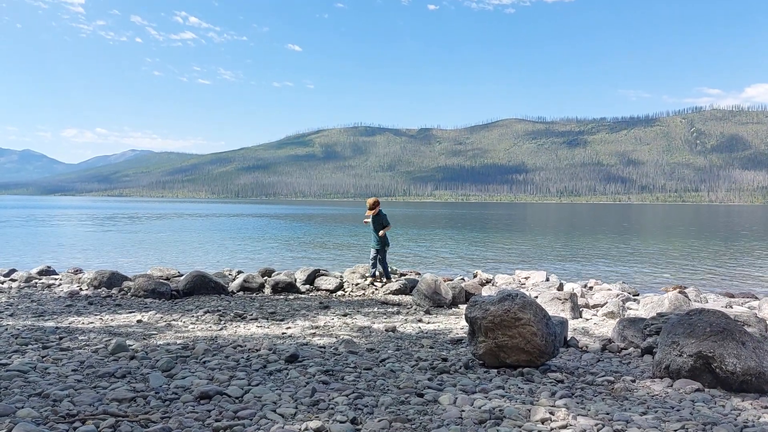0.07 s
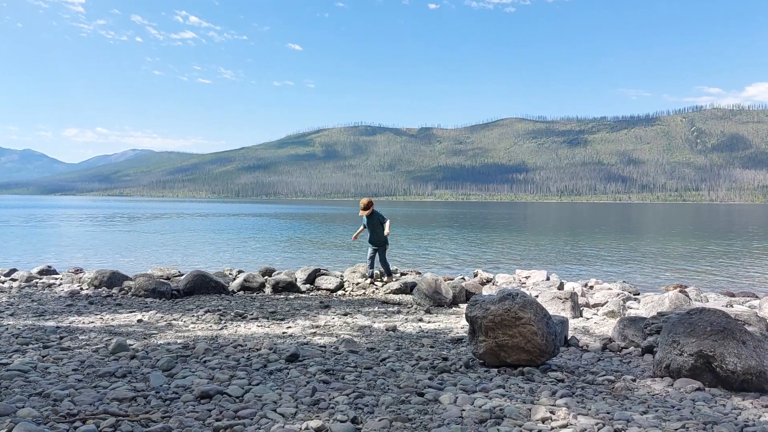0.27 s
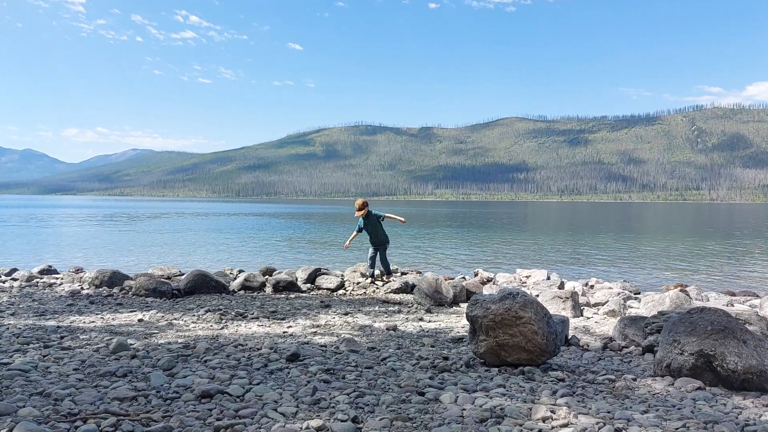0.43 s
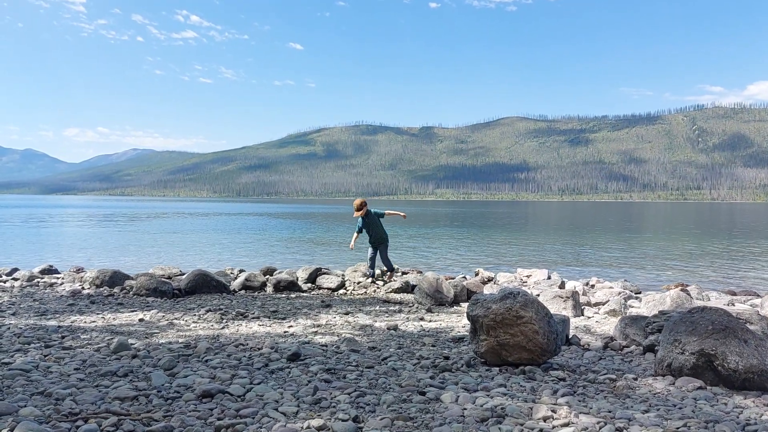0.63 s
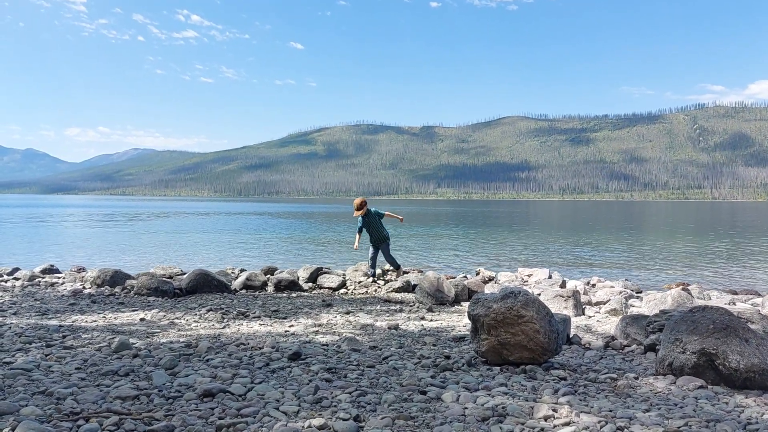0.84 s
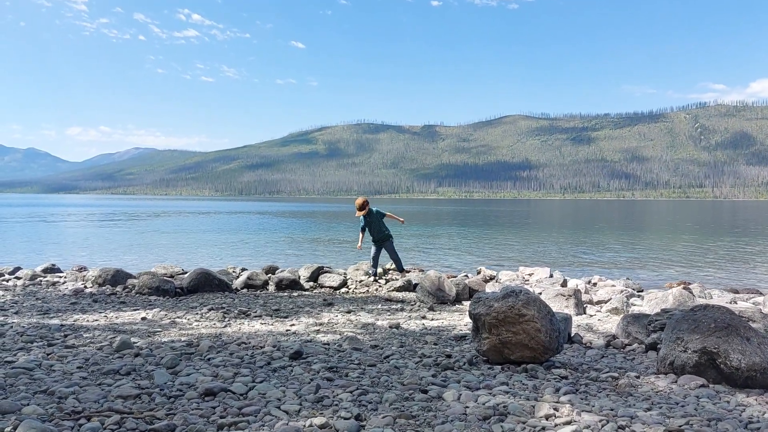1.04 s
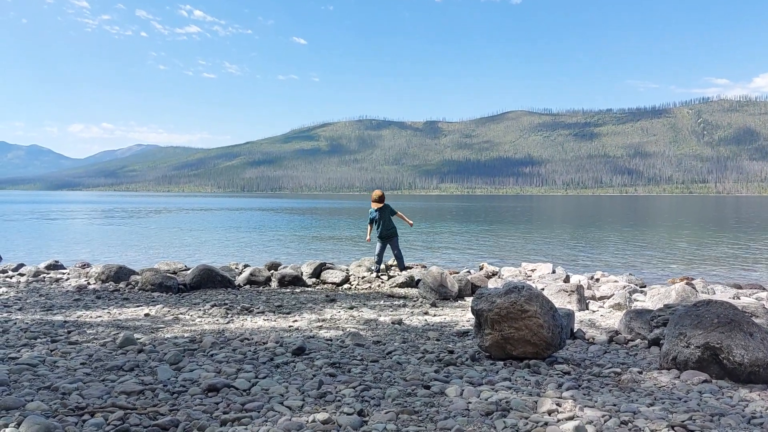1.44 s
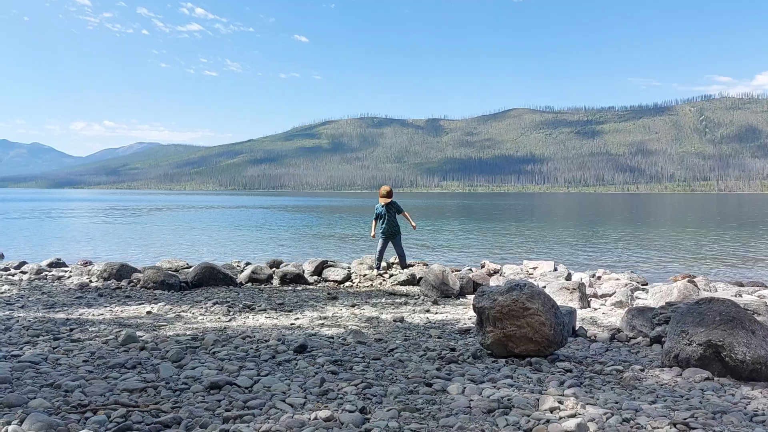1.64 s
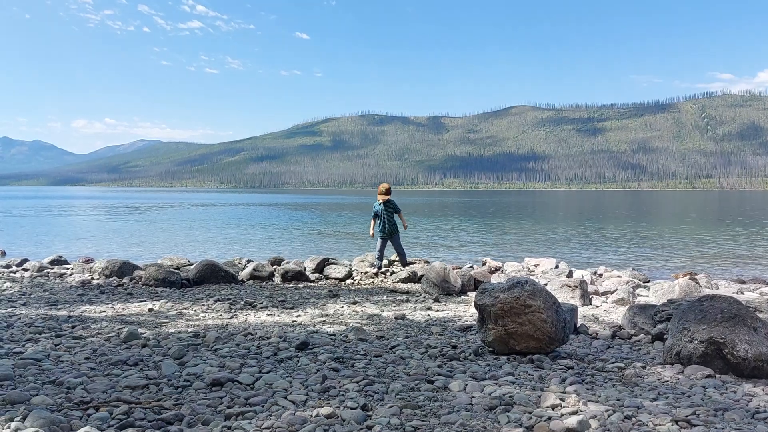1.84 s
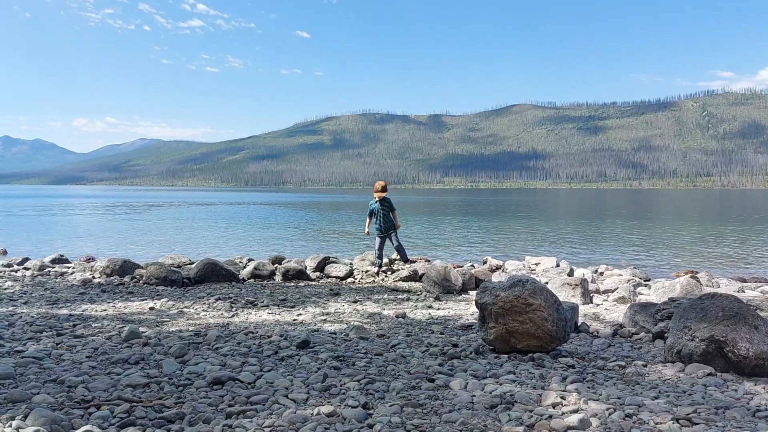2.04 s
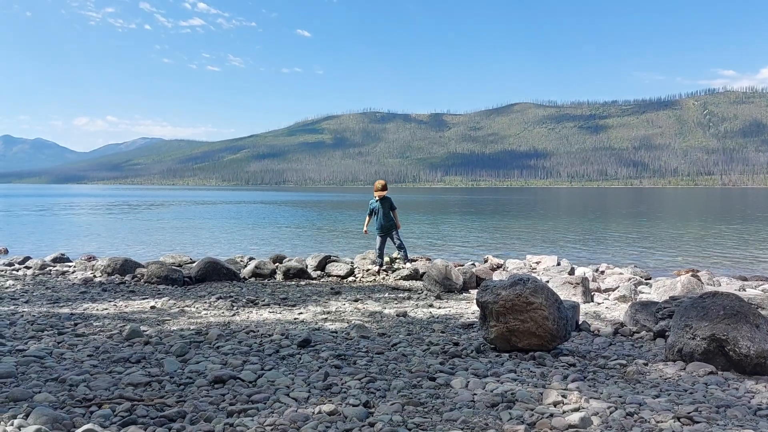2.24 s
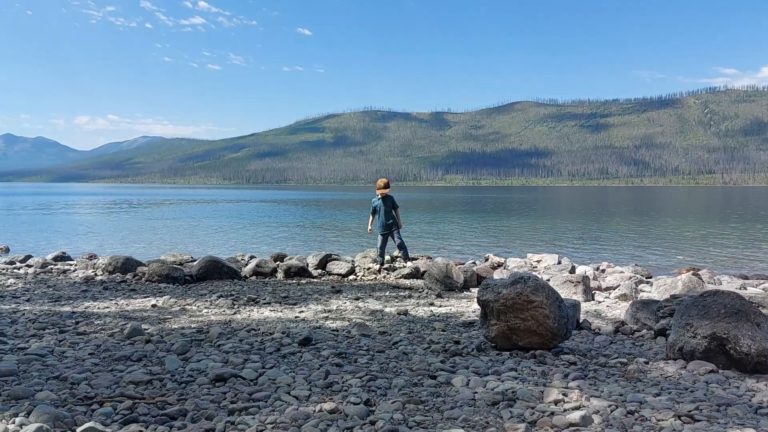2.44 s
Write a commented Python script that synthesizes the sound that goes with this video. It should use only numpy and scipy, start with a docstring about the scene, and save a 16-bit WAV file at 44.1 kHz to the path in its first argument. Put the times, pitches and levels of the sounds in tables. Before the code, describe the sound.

Stones crunch and click underfoot with rustling clothes over a low wind.

```python
"""A pebble lakeshore: someone shifts their footing, close by and to the left. Clothing swishes as its fibres
slip, grit crunches under the shoe in tiny ringing grains, and loose stones click and grind against each other,
some knocks with a hollow low body. Behind it lie a low wind and a faint steady drone, perhaps a far motor."""
import sys
import numpy as np
from scipy import signal
from scipy.fft import rfft, irfft
from scipy.io import wavfile

SR = 44100
rng = np.random.default_rng(int(sys.argv[2]) if len(sys.argv) > 2 else 0)


def log_audio(samples):
    """Write samples as a 16-bit WAV file to the path given in sys.argv[1]."""
    # one column per channel
    frames = np.atleast_2d(samples).T
    # limit to full scale, then quantise
    limited = np.clip(frames, -1, 1)
    pcm = np.round(limited * 32767).astype(np.int16)
    wavfile.write(sys.argv[1], SR, pcm)


N = 110250
TIME = np.arange(N) / SR
FREQS = np.maximum(np.fft.rfftfreq(N, 1 / SR), 1)


def from_db(db):
    """Decibels to gain."""
    return 10 ** (np.asarray(db) / 20)


def rms_one(x):
    """Scale to unit rms."""
    return x / np.sqrt(np.mean(x ** 2) + 1e-20)


def envelope(points):
    """Gain over time from (time [s], level [dB]) points."""
    return from_db(np.interp(TIME, *np.transpose(points)))


def by_hz(points):
    """Spread (frequency [Hz], value) points over all frequencies."""
    hz, value = np.transpose(points)
    return np.interp(np.log(FREQS), np.log(hz), value)


def coloured(x, eq):
    """Shape a signal with an EQ curve; rms 1."""
    return rms_one(irfft(rfft(x) * from_db(by_hz(eq)), N))


def drift(rate_hz):
    """Smooth random modulation; rms 1."""
    return rms_one(irfft(rfft(rng.standard_normal(N)) / (1 + (FREQS / rate_hz) ** 2), N))


def resonance(x, hz, width_hz):
    """Two-pole resonance with unit gain at its peak."""
    r = np.exp(-np.pi * width_hz / SR)
    feedback = [1, -2 * r * np.cos(2 * np.pi * hz / SR), r * r]
    return signal.lfilter(np.array([1, 0, -1]) * (1 - r * r) / 2, feedback, x + 1e-18)


def wide_noise(side_db):
    """Stereo noise with a given side level."""
    mid, side = rng.standard_normal((2, N))
    return mid + from_db(side_db) * side * np.array([[1], [-1]])


def slips(per_s, spread_db):
    """Random tiny slips of uneven size; rms 1."""
    sizes = from_db(spread_db * np.minimum(rng.exponential(1, N), 4)) * rng.choice([-1, 1], N)
    return rms_one(sizes * (rng.random(N) < per_s / SR))


def scatter(x, decay_s):
    """Diffuse stereo noise that follows the energy of x and dies away after it."""
    r = np.exp(-1 / (decay_s * SR))
    energy = signal.lfilter([1 - r], [1, -r], x ** 2 + 1e-18)
    return np.sqrt(energy) * rng.standard_normal((2, N))


def from_left(direct, scattered, right_lag_s=.000405):
    """A source on the left arrives later and duller on the right; the stones scatter its treble."""
    # lean to the left: (frequency [Hz], left minus right [dB])
    balance = [(200, 0), (1200, -0.5), (2400, 3.5), (4400, 3), (7000, 6.5), (8900, 6.5), (11000, 3),
               (13000, 6.5), (15500, 2)]
    # EQ of the scattered sound: (frequency [Hz], gain [dB])
    scatter_eq = [(300, -7.5), (900, 2), (2000, 3), (4000, 2.5), (8000, 5), (15000, 5)]
    pan = from_db(by_hz(balance) / 2)
    lag = np.exp(-2j * np.pi * FREQS * right_lag_s * np.array([[0], [1]]))
    spectrum = rfft(direct) * lag + rfft(scattered) * from_db(by_hz(scatter_eq))
    return irfft(spectrum * np.array([pan, 1 / pan]), N)


def wind():
    """A wide, low bed of wind gusts over the shore."""
    # bass-heavy rumble: (frequency [Hz], relative level [dB])
    rumble_eq = [(20, -37), (40, -9.5), (62, 1), (95, -3), (150, -7), (260, -5), (380, -10.5), (500, -22),
                 (700, -37.5), (1400, -52.5), (4000, -44.5), (16000, -53)]
    # slow swell under the gusts: (time [s], level [dB])
    swell = [(0, -53), (.65, -49), (1.0, -52.5), (1.2, -49.5), (1.37, -57.5), (1.55, -51), (1.75, -56.5),
             (2.08, -52.5), (2.3, -56.5), (2.5, -60)]
    gusts = from_db(2.54 * drift(rate_hz=3.9))
    return coloured(wide_noise(side_db=-5), rumble_eq) * envelope(swell) * gusts


def drone(wander_hz=1.06):
    """A faint hum, perhaps a far motor, each partial wavering in pitch."""
    # partials of the hum: (frequency [Hz], rms level [dB])
    partials = [(69.5, -63), (118.5, -62.5), (179, -66), (241, -62.5), (300.5, -60), (361, -76.5)]
    hum = np.zeros(N)
    for hz, db in partials:
        cycles = np.cumsum(hz + wander_hz * drift(rate_hz=3.86)) / SR + rng.random()
        hum += np.sqrt(2) * from_db(db) * np.sin(2 * np.pi * cycles)
    return hum


def cloth():
    """Fabric slides in a dense, uneven stream of slips, with a dull rub underneath."""
    # envelopes of the swish and the rub: (time [s], relative level [dB])
    swish_levels = [(0, -46.5), (.085, -58), (.12, -51), (.17, -74), (.24, -40.5), (.335, -25), (.37, -39),
                    (.44, -39), (.53, -46.5), (.62, -38), (.72, -49.5), (.81, -47.5), (.92, -73),
                    (1.09, -81), (1.105, -37.5), (1.18, -46), (1.28, -67), (1.35, -81), (1.46, -92),
                    (1.56, -51.5), (1.65, -74), (1.8, -69.5), (1.9, -63), (2.13, -48.5), (2.19, -72.5),
                    (2.31, -61.5), (2.41, -76.5), (2.5, -64.5)]
    rub_levels = [(0, -48.5), (.12, -49), (.19, -41), (.24, -39), (.28, -30.5), (.34, -31.5), (.38, -37),
                  (.45, -41), (.52, -49), (.65, -52.5), (.8, -59.5), (.92, -69.5), (1.45, -69), (1.52, -53),
                  (1.62, -62), (1.75, -69), (1.9, -92), (2.12, -52.5), (2.25, -67), (2.5, -80)]
    # airy swish, dark rub: (frequency [Hz], relative level [dB])
    swish_eq = [(300, -11), (550, -9), (800, -6.5), (1250, -12.5), (2100, -1.5), (3300, -6), (5100, 1.5),
                (6200, -3.5), (7400, -1.5), (10000, -7), (12500, -1), (16000, -9.5)]
    rub_eq = [(30, -49), (70, -28), (120, -2.5), (170, -3.5), (260, 1.5), (400, -2.5), (520, -7),
              (750, -13), (1000, -8), (1400, -9), (3000, -20.5)]
    fibres = slips(per_s=9000, spread_db=3.0) * from_db(2.3 * drift(rate_hz=91))
    diffuse = from_db(0.5) * coloured(scatter(fibres, decay_s=.0007), swish_eq)
    swish = from_left(coloured(fibres, swish_eq), diffuse) * envelope(swish_levels) * from_db(-4)
    rub = coloured(rng.standard_normal(N), rub_eq)
    diffuse_rub = from_db(-7.5) * coloured(rng.standard_normal((2, N)), rub_eq)
    return swish + from_left(rub, diffuse_rub) * envelope(rub_levels)


def grit():
    """Small stones of many sizes slip under the sole, each ringing for a few cycles."""
    # envelope of the crunch: (time [s], relative level [dB])
    crunch_levels = [(0, -47), (.08, -60.5), (.13, -49.5), (.2, -50), (.3, -41), (.45, -44.5), (.53, -53),
                     (.62, -55), (.7, -64), (.79, -51.5), (.87, -59), (.94, -80.5), (1.0, -58.5),
                     (1.055, -78), (1.095, -89), (1.115, -44), (1.18, -73), (1.3, -66), (1.4, -86),
                     (1.455, -77), (1.49, -56.5), (1.57, -47.5), (1.64, -63.5), (1.72, -59.5), (1.77, -73),
                     (1.88, -69), (1.96, -58), (2.13, -55.5), (2.2, -75), (2.4, -73.5), (2.5, -85.5)]
    # EQ of the crunch: (frequency [Hz], relative gain [dB])
    crunch_eq = [(300, 9), (900, -15), (1400, 2.5), (2200, 1), (3000, -4.5), (3900, 1), (5200, -3),
                 (7000, -9), (10000, -20), (16000, -18)]
    grains = sum(rms_one(resonance(slips(per_s=120, spread_db=3.5), hz, hz * 0.21)) * np.sqrt(hz)
                 for hz in np.geomspace(700, 14000, 14))
    grains *= from_db(2.15 * drift(rate_hz=70))
    diffuse = from_db(1.5) * coloured(scatter(grains, decay_s=0.0024), crunch_eq)
    return from_left(coloured(grains, crunch_eq), diffuse) * envelope(crunch_levels)


def clacks():
    """Some of the knocks also carry a dull, hollow body that rings briefly in low modes."""
    # hollow body under some knocks: (time [s], relative level [dB])
    hits = [(0.7845, -43), (1.0709, -48), (1.1185, -38.5), (1.2668, -47), (1.2813, -43), (1.3041, -41),
            (1.4629, -32)]
    # modes of the stone: (frequency [Hz], relative level [dB], time to fall 60 dB [s])
    modes = [(301, -6.5, 0.028), (647, -4.5, .011), (880, -9, 0.011), (1050, -16, 0.0072),
             (1590, -3.5, 0.0051), (2300, 0.5, 0.0068)]
    direct, t = np.zeros(N + SR), TIME[:SR // 10]
    for start_s, db in hits:
        i = int(start_s * SR)
        for k, (hz, mode_db, t60) in enumerate(modes):
            ring = np.sin(2 * np.pi * hz * t) * np.exp(-np.log(1000) * t / t60)
            direct[i:i + len(t)] += (-1) ** k * from_db(db + mode_db) * ring
    diffuse = from_db(8) * resonance(scatter(direct[:N], decay_s=0.00091), hz=892, width_hz=680)
    return from_left(direct[:N], diffuse)


def knocks():
    """Stones knock together: a pitched snap, a bright tick and a few milliseconds of grinding."""
    # stone on stone: (time [s], relative level [dB], pitch [Hz], share of grinding [0-1])
    hits = [(.1378, -35, 9700, 0.69), (0.266, -18, 7900, 0.25), (0.3332, -18.5, 7300, 0.26),
            (0.4928, -25.5, 5600, 0.28), (0.5064, -31, 9900, 0.27), (.5536, -30.5, 10500, 0.58),
            (0.566, -34, 6630, 0.47), (.575, -32, 6600, 0.53), (0.5956, -23.5, 7060, 0.2),
            (0.6115, -26, 7300, 0.6), (0.6333, -24, 6600, 0.88), (0.68, -28.5, 5700, 0.96),
            (0.7133, -13.5, 6500, 0.2), (.736, -33, 7400, 0.51), (0.7449, -27.5, 6000, 1),
            (0.7604, -29, 7400, 1), (0.7645, -26, 5660, 0.84), (0.7682, -26, 7400, 1),
            (0.773, -28, 6360, 0.55), (0.7854, -14.5, 5000, 0.33), (.799, -26.5, 5200, 0.24),
            (.8252, -28, 7900, 0.76), (.857, -36, 4200, 1), (0.8641, -33, 2400, 0.28),
            (0.8807, -29, 2720, 0.4), (0.8853, -32.5, 10500, 0.43), (.9237, -43, 5400, 0.19),
            (0.9887, -28, 3900, 0.19), (0.995, -30, 3360, 0.78), (1.007, -25.5, 4350, 0.23),
            (1.0683, -17, 3530, .25), (1.072, -28, 3960, 0.23), (1.0763, -35, 5600, 1),
            (1.078, -29.5, 2890, 0.99), (1.0982, -24, 5470, 1), (1.1043, -26, 8500, 0.88),
            (1.108, -26.5, 9900, 0.71), (1.1126, -28.5, 5500, 1), (1.1172, -9.5, 5460, 0.49),
            (1.1296, -21, 8100, .5), (1.189, -33, 8200, 0.42), (1.2268, -40, 7260, 1),
            (1.2658, -36.5, 3170, 0.88), (1.2812, -31.5, 2970, 0.22), (1.2915, -46, 5700, 0.34),
            (1.304, -31.5, 3370, 0.8), (1.36, -50, 2300, 0.8), (1.4625, -26, 5300, 0.88),
            (1.488, -35, 2900, 0.91), (1.5105, -36.5, 5600, 0.54), (1.539, -24.5, 5800, 0.45),
            (1.556, -24, 5370, 0.2), (1.6053, -33.5, 6450, 1), (1.609, -33, 4130, 0.36),
            (1.6195, -36, 5670, 0.42), (1.622, -35, 6660, 0.78), (1.652, -42.5, 4500, 0.4),
            (1.6904, -42.5, 2440, .8), (1.7117, -40, 5600, .7), (1.7188, -41.5, 4060, 0.64),
            (1.9854, -33.5, 2830, 0.78), (1.999, -40.5, 3630, 1), (2.144, -38, 5000, 0.89),
            (2.1917, -43.5, 9600, .4)]
    # EQ peaks that brighten all the knocks: (frequency [Hz], width [Hz], gain [linear])
    knock_eq = [(2300, 1400, 1), (5000, 3200, 0.55), (12140, 1800, 1)]
    tick_decay_s, grind_decay_s, scatter_decay_s = 0.00032, 0.0016, 0.003
    t, contact_samples = TIME[:SR // 16], SR // 2000
    bus = np.zeros((3, N + SR))  # direct, scattered left, scattered right
    for start_s, db, hz, grind in hits:
        snap = resonance(resonance(1. * (t == 0), hz, hz * .7), hz, hz * 0.64)
        snap *= 0.98 * np.sqrt(contact_samples / np.sum(snap ** 2))
        snap *= 1 - 1.04 * grind  # more grind, less snap
        rasp = rms_one(resonance(rng.standard_normal((3, len(t))), hz, hz * 0.78))
        grind_envelope = grind * 0.56 * np.exp(-t / grind_decay_s)
        tail_envelope = 1.04 * grind_envelope + from_db(-12.5) * np.exp(-t / scatter_decay_s)
        knock = np.vstack([snap + rasp[0] * grind_envelope, rasp[1:] * tail_envelope])
        high_cut = signal.butter(2, min(hz * 1.85, .45 * SR), fs=SR)
        tick = rms_one(resonance(rng.standard_normal(len(t)), hz=12300, width_hz=1400))
        i = int(start_s * SR)
        bus[0, i:i + len(t)] += from_db(db - 21.5) * tick * np.exp(-t / tick_decay_s)
        bus[:, i:i + len(t)] += from_db(db - 4.5) * signal.lfilter(*high_cut, knock)
    bus = bus[:, :N]
    boost = sum(gain * resonance(bus, hz, width_hz) for hz, width_hz, gain in knock_eq)
    low_cut = signal.butter(2, 1110, "high", fs=SR, output="sos")
    bus = signal.sosfilt(low_cut, bus + boost)
    return from_left(bus[0], bus[1:])


def scene():
    """Cloth and stones nearby, wind and drone far off."""
    return cloth() + grit() + knocks() + clacks() + wind() + drone()


def record(dry):
    """A steep high cut takes off the very top."""
    cutoff_hz = 16100
    return signal.sosfilt(signal.ellip(12, .1, 80, cutoff_hz, fs=SR, output="sos"), dry)


dry = scene()
out = record(dry)
log_audio(out)
```